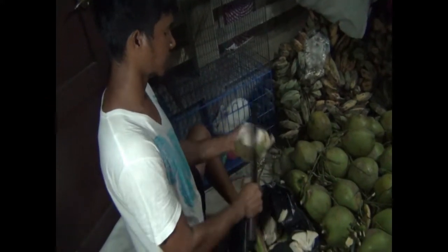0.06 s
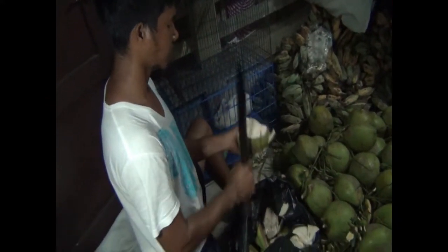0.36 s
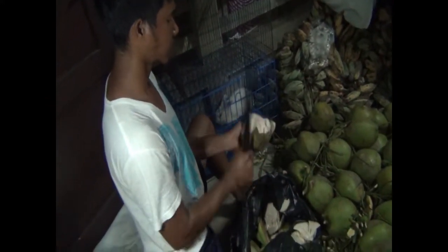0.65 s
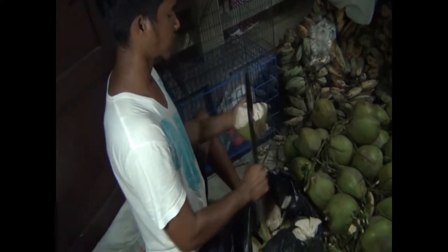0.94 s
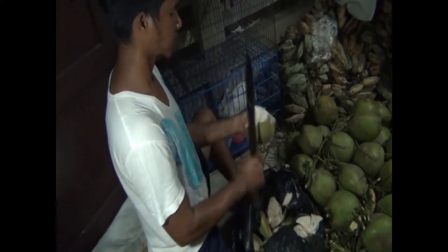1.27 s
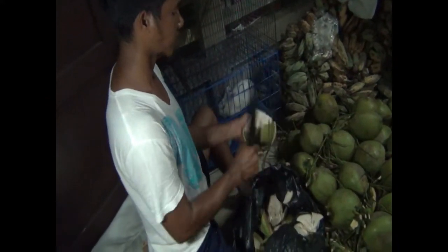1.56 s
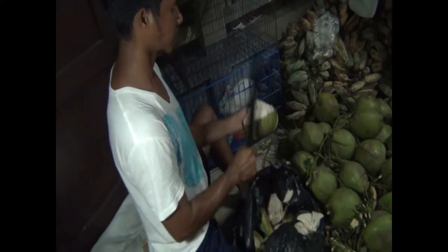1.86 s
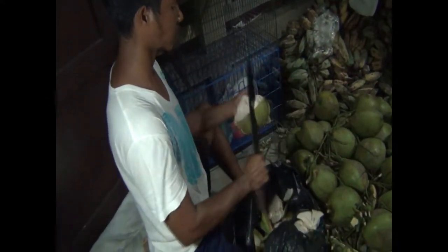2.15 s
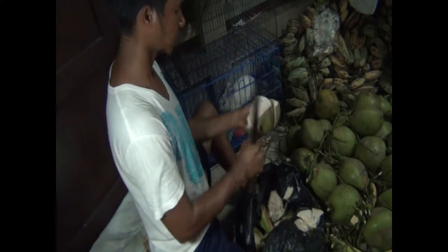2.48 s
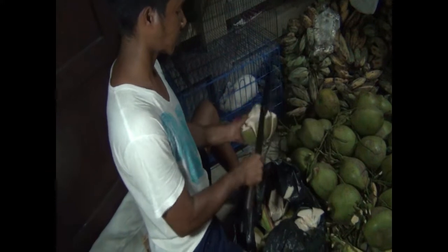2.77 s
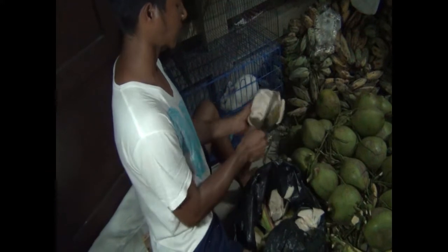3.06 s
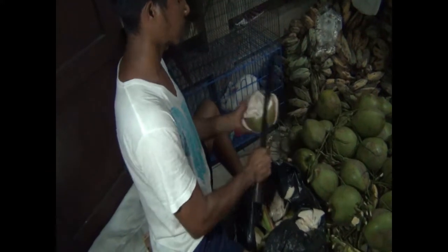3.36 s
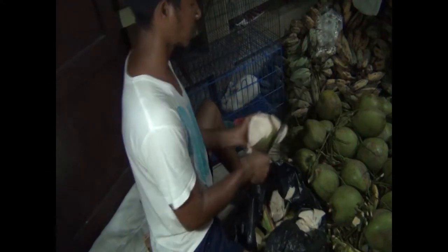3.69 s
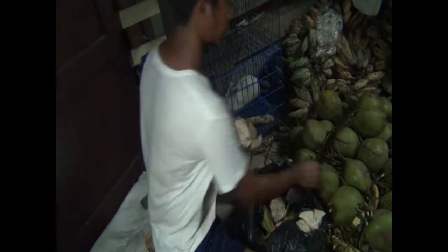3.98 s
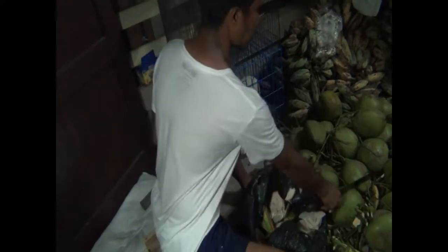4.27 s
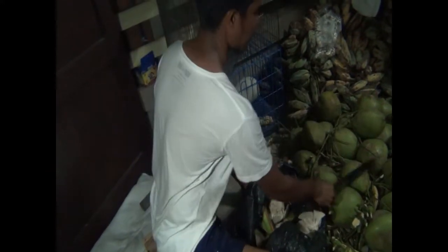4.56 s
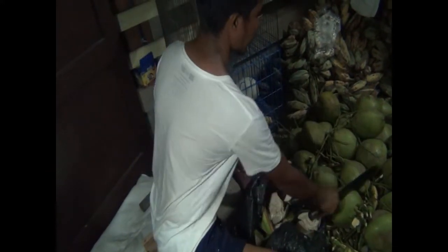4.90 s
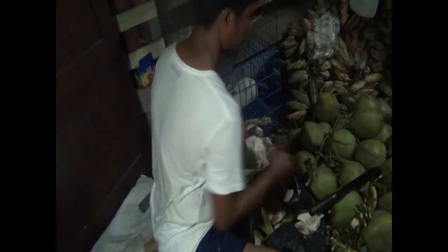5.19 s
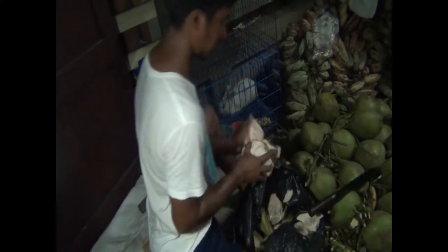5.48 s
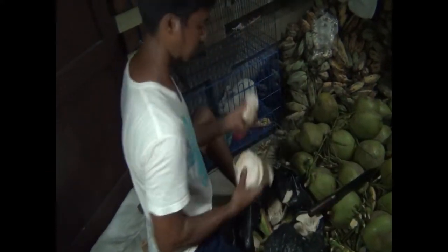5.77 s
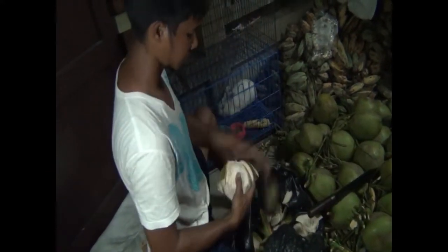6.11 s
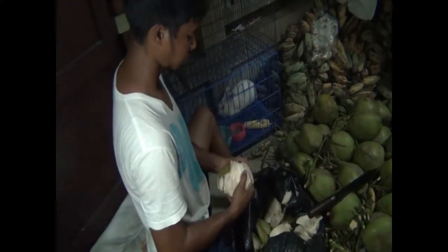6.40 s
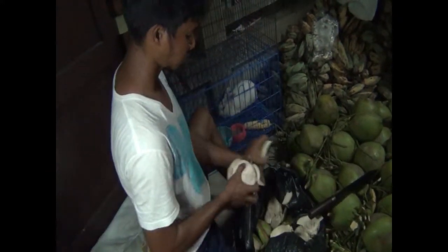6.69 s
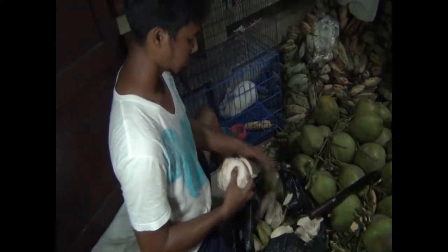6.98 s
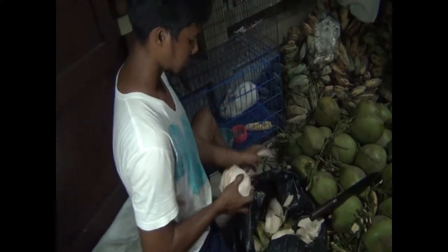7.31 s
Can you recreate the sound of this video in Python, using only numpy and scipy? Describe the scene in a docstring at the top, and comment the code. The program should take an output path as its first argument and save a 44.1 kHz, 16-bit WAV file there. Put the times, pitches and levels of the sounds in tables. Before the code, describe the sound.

A large knife trims a green coconut in quick strokes, each a sharp crunch and hollow knock, then a wet fibrous hiss, often with a faint steel ring. Two woody chops follow as the blade strikes a heap of nuts. Hands then tear off strips that rasp and snap, and scraps drop onto a crinkly plastic bag. It sounds close, in a small room with a faint machine hum.

```python
"""At a coconut stall, a large knife trims a green nut: it bites into the husk, hisses through the
wet fibres and rings as it comes free, while the hollow nut knocks and resounds under it.
The knife is then chopped twice into a heap of nuts. Hands tear off loose strips, which rasp and
snap, and scraps drop on a crinkly plastic bag. A small room answers, over a faint machine hum."""
import sys
import numpy as np
from scipy import signal
from scipy.fft import rfft, irfft, next_fast_len
from scipy.io import wavfile
from scipy.ndimage import map_coordinates

SR = 44100
rng = np.random.default_rng(int(sys.argv[2]) if len(sys.argv) > 2 else 0)


def to_wav(sig):
    """Store sig (one row per channel, or 1-D mono) as 16-bit WAV at the path in sys.argv[1].

    Samples outside -1..1 are clipped; the rate is SR.
    """
    pcm = np.clip(np.atleast_2d(sig), -1, 1) * 32767
    pcm = np.round(pcm).astype(np.int16)
    wavfile.write(sys.argv[1], SR, pcm.T)  # frames by channels


N = 328534

# Levels are set before each function's own gains. A fade time (t60) is the time to fall by 60 dB.
# The blade bites. Each row: start in seconds, level in dB, extra dB for the knock, pitch multiplier.
BITE_HITS = [(0.0953, -12.5, -11.5, .97), (0.4626, -13.5, -17, 1.1), (0.7877, -13.5, -13, 1.03),
             (1.384, -11, -24, 1.04), (1.694, -12, -24, 1.07), (1.9975, -13, -17.5, 1),
             (2.6194, -12, -15.5, 1.07), (3.2803, -13, -22, 1.12)]
# Pushes through the husk. Each row: moment of full force, hold time and ramp time in seconds,
# level in dB, extra dB for the hollow tone, its pitch in Hz.
HUSK_PUSHES = [(0.162, 0.032, 0.03, -22.5, -9, 1750), (0.504, 0.088, 0.014, -25.5, -7.5, 1660),
               (1.092, 0.068, 0.016, -22.5, -7.5, 1700), (1.444, 0.032, 0.023, -22.5, -4.5, 1650),
               (1.735, 0.05, 0.016, -23.5, -11.5, 1880), (2.294, 0.054, .024, -21, -8.5, 1730),
               (2.704, 0.036, 0.035, -36.5, -7.5, 1800), (2.904, 0.016, 0.042, -20.5, -6.5, 1800),
               (3.56, 0.082, 0.01, -22, -7.5, 1850)]
# Flaps break away, longer ones sounding lower. Each row: start in seconds, level in dB, pitch in Hz.
FLAP_BREAKS = [(.505, -25, 2900), (0.581, -30, 1056), (1.137, -25, 1084), (1.445, -22.5, 1510),
               (2.325, -26.5, 1620), (2.909, -24, 1600), (3.563, -24, 1570), (7.164, -26, 1850)]
# The blade slips free. Each row: start in seconds, then dB for the first, second and two high tones.
BLADE_RELEASES = [(0.268, -51.5, -59, -37.5), (.63, -65, -50.5, -42.5), (1.225, -53, -48.5, -44.5),
                  (1.527, -59, -48, -38.5), (1.864, -57, -53, -40), (2.45, -60, -60, -41.5)]
# Light knocks on the nut. Each row: start in seconds, level in dB.
KNIFE_TAPS = [(0.06, -29.5), (0.413, -29.5), (0.7256, -33), (1.034, -27.5), (2.58, -37), (3.2489, -23.5),
              (3.907, -23)]
# Chops into the heap. Each row: start in seconds, level in dB, extra dB for the crack, pitch multiplier.
HEAP_CHOPS = [(4.2434, -8.5, -8, 1.04), (4.944, -7.5, -10, .99)]
# The stuck blade is levered. Each row: start in seconds, level in dB, length in seconds.
LEVER_CREAKS = [(4.527, -38, 0.06), (5.047, -40.5, 0.034)]
# Strips torn by hand. Each row: start and length in seconds, level in dB, extra dB for the crackle.
STRIP_TEARS = [(5.438, 0.28, -32, -4), (6.5, 0.235, -29, -8), (7.2, 0.074, -29, -6)]
# Thick fibres snap. Each row: start in seconds, level in dB, fade time in seconds.
FIBRE_SNAPS = [(3.707, -25, 0.066), (3.7966, -22, 0.071), (3.873, -25, 0.073), (3.9074, -19, 0.045),
               (5.432, -12, 0.011), (5.4448, -13.5, .008), (5.4672, -14, .008), (5.507, -16.5, .012),
               (5.5185, -16, .003), (5.5475, -12, .02), (5.558, -15.5, .04), (5.5697, -10, 0.011),
               (5.6184, -16, .015), (5.667, -12.5, .035), (6.3714, -24.5, 0.033), (6.475, -23, .04),
               (6.497, -21.5, .05), (6.6044, -10.5, 0.042), (6.7359, -17, .055), (7.236, -15, 0.043)]
# A strip slides off. One row: start and length in seconds, level in dB, pitch in Hz, rise in Hz a second.
STRIP_SQUEAK = (7.238, .022, -43, 3200, 2500)
# Scraps land. Each row: start in seconds, level in dB, extra dB for the thud, crinkle fade in seconds.
SCRAP_DROPS = [(4.2954, -22.5, -21, .13), (6.205, -22, -3, .1), (6.2235, -10, -7, 0.12),
               (6.3014, -24.5, -20, 0.18), (7.016, -25.5, -1, 0.32), (7.056, -18, -17, .11),
               (7.103, -23.5, -4.5, 0.13), (7.1645, -18.5, -12, 0.037), (7.301, -18.5, -10.5, 0.099),
               (7.3495, -16, -22, 0.07), (7.399, -20, -20, .09)]

# The steel's own tones. Each row: pitch in Hz, fade time in seconds.
STEEL_TONES = [(4274, .45), (5071, .4), (11472, .15), (12651, .12)]
# Tones of struck things. Each row: pitch in Hz, level in dB, fade time in seconds.
NUT_TONES = [(270, -3, .1), (410, -4, .09), (840, 1, .08)]
CLACK_TONES = [(1238, -4, .05), (3020, -3.5, 0.096), (3140, 0.5, 0.083), (3413, -3, 0.08), (3730, -6, .06)]
HEAP_TONES = [(86.1, -19.5, 0.36), (419, -14.5, 0.15), (970, -11, 0.12), (1047, -11.5, 0.15),
              (1285, -10, 0.1), (1430, -2, 0.11), (1500, 4.5, 0.028), (1800, -1, 0.09)]
# The machine's hum. Each row: pitch in Hz, level in dB.
HUM_TONES = [(88, -65.5), (351, -52.5)]

# A flap's tone colour. Each row: multiple of the flap's pitch, relative level in dB.
FLAP_COLOUR = [(.4, -24.5), (.8, -16), (1, 1.5), (1.25, -11.5), (2.2, -12.5), (5, -38)]
# Tone colours of the other noises. Each row: frequency in Hz, relative level in dB.
CRACK_COLOUR = [(300, -31), (1100, -3), (2000, -1), (2750, -0.5), (4000, -3.5), (7800, -4.5), (9600, -1),
                (10150, 4), (10700, 1), (13000, -3), (15800, -18)]
KNOCK_COLOUR = [(100, -15.5), (200, 2), (330, 6), (425, 8.5), (560, 2.5), (850, 6.5), (1400, 9.5),
                (3500, -8.5)]
FIBRE_COLOUR = [(1100, -12), (2000, 1.5), (3000, 3), (4500, -1), (6500, 2.5), (10000, 5.5), (11800, 7),
                (14000, -2.5), (15800, -10.5)]
HOLLOW_COLOUR = [(150, -27.5), (430, -10.5), (600, -15.5), (1000, -2.5), (1400, -1), (1750, 8), (2150, 0.5),
                 (2900, -10), (5000, -11)]
SNAP_COLOUR = [(900, -18.5), (2200, -6.5), (5000, -5.5), (9000, -0.5), (12000, -2.5), (16000, -14.5)]
BAG_COLOUR = [(300, -13), (800, -2.5), (1700, -1.5), (3000, -3), (5000, -8.5), (9000, -4.5), (13000, -13),
              (16000, -28)]
THUD_COLOUR = [(50, -33), (105, -20), (170, -9), (320, -5), (405, 1), (520, -6), (900, -6.5), (2500, -17)]
AIR_COLOUR = [(15, -74), (25, -25), (50, -6.5), (240, -3), (470, -10.5), (950, -10.5), (1750, -15.5),
              (3100, -25.5), (5500, -28.5), (15800, -31)]
AIR_SIDE_COLOUR = [(30, -28), (300, -8), (1000, -8), (15000, -31)]
TICK_COLOUR = [(400, -23), (1200, 2), (2300, -4), (3400, 0), (4600, -12), (10000, -7.5), (16000, -17)]
WOOD_COLOUR = [(35, -36), (80, 2), (130, -12), (700, -13), (1050, -1.5), (1550, 5), (2200, -1),
               (3000, -7.5), (6000, -27)]
RIND_COLOUR = [(400, -7.5), (1200, -4.5), (4500, -6), (9000, -7), (15000, -22)]
STRAND_COLOUR = [(1000, -17), (2000, -.5), (5000, -4), (10000, 4), (12500, 1), (15800, -10.5)]

# The room's echo. Each row: frequency in Hz, fade time in seconds.
ROOM_FADES = [(150, 0.49), (1500, 0.33), (5000, 0.26), (14000, 0.23)]
# Timing at the two microphone openings. Each row: frequency in Hz, the left one's lead in radians.
LEFT_LEAD = [(100, 0.016), (1100, 0.52)]
# Their balance. Each row: frequency in Hz, left level minus right level in dB.
LEFT_BALANCE = [(200, -0.1), (9000, -2.5)]


def bites(crack_db=-4, knock_db=-3, ring_db=-8, sink_s=.00503):
    """The edge crushes a dense pack of fibres in a moment, sinks in and knocks the hollow nut."""
    edge, nut = np.zeros((2, N))
    for start, db, body_db, pitch in BITE_HITS:
        add(edge, start, amp(db + crack_db) * burst(rise=.0015, hold=.0077, t60=.058))
        blow = burst(rise=.00038, hold=.023, t60=.13) * rng.standard_normal(SR // 2)
        add(nut, start, amp(db + body_db + knock_db) * colour(blow, KNOCK_COLOUR, pitch))
        add(nut, start + sink_s, amp(db + body_db + ring_db) * ringing(NUT_TONES, pitch, spread_db=.5))
    return colour(edge * crush_fibres(), CRACK_COLOUR) + nut


def crush_fibres():
    """Packed fibres give way so fast that they blur into one crunch."""
    return fibres(14000, spread_db=1, clump_db=1.4, clump_rate=540)


def slices(hollow_db=-1.4, judder_db=5, catch_db=1.5, sway_ratio=1.104, growth_db_per_s=55):
    """The blade runs through wet husk: thousands of fine breaks a second hiss and stir the hollow nut."""
    t, edge, body = np.arange(N) / SR, np.zeros(N), np.zeros(N)
    hollow_peak_hz = 1750
    breaks = fibres(7000, spread_db=1.5, clump_db=3, clump_rate=560)
    slip = np.tanh(wobble(140))  # the blade catches and slips
    # The lifting flap changes length, so the hollow tone sways between three pitches.
    sway = np.tanh(wobble(22.02))
    shares = (np.maximum(-sway, 0), 1 - np.abs(sway), np.maximum(sway, 0))
    for start, hold, ramp, db, body_db, hz in HUSK_PUSHES:
        force = amp(db + push_db(start, hold, ramp)) * breaks
        edge += force
        cut = np.flatnonzero(np.abs(t - start) < .4)
        # As the flap grows, the hollow tone gains on the hiss.
        growth_db = growth_db_per_s * np.clip(t[cut] - start - hold / 2, -hold / 2, hold / 2)
        nut = force[cut] * amp(body_db + hollow_db + growth_db + judder_db * slip[cut])
        for share, ratio in zip(shares, (1 / sway_ratio, 1, sway_ratio)):
            add(body, t[cut[0]], colour(nut * share[cut], HOLLOW_COLOUR, ratio * hz / hollow_peak_hz))
    return colour(edge * amp(catch_db * slip), FIBRE_COLOUR) + body


def push_db(start, hold, ramp, db_per_ramp=12, sag_db_per_s=80, release_ratio=1.14):
    """Level of one push: the knife bears down, slows in the cut and lets go a little more gently."""
    t = np.arange(N) / SR - start
    ramps_away = (np.maximum(-t, 0) + np.maximum(t - hold, 0) / release_ratio) / ramp
    return -db_per_ramp * np.minimum(ramps_away, 20) - sag_db_per_s * np.clip(t, 0, hold)


def flaps(flap_db=-1):
    """The last fibres of a flap of husk give way together and ring it with a woody crunch."""
    out = np.zeros(N)
    breaks = fibres(9000, spread_db=2.5, clump_db=0, clump_rate=300)
    for start, db, hz in FLAP_BREAKS:
        force = np.zeros(N)
        add(force, start, amp(db + flap_db) * burst(rise=.0012, hold=.0073, t60=.088))
        out += colour(force * breaks, FLAP_COLOUR, hz)
    return out


def blade_ring(ring_db=3, waver_db=5):
    """The edge scrapes off the nut and leaves the steel ringing, wavering as the knife swings back."""
    ring, scrape, t = np.zeros(N), np.zeros(N), np.arange(SR // 2) / SR
    for k, (hz, t60) in enumerate(STEEL_TONES):
        tone = np.zeros(N)
        ping = burst(rise=.0032, hold=.019, t60=t60) * np.sin(2 * np.pi * hz * t)
        for start, first_db, second_db, high_db in BLADE_RELEASES:
            add(tone, start, amp((first_db, second_db, high_db, high_db)[k]) * ping)
        ring += tone * amp(ring_db + waver_db * np.tanh(wobble(29.86)))
    for start, _, _, high_db in BLADE_RELEASES:
        add(scrape, start - .008, amp(high_db + 5) * burst(rise=.0051, hold=.01, t60=.15))
    return ring + colour(scrape * rng.standard_normal(N), FIBRE_COLOUR)


def taps(tick_db=-9, clack_db=-13):
    """The knife knocks lightly on the nut: a dry tick and a small pitched clack."""
    force, clacks = np.zeros((2, N))
    for start, db in KNIFE_TAPS:
        add(force, start, amp(db + tick_db) * burst(rise=.00036, hold=.0012, t60=.09))
        add(clacks, start, amp(db + clack_db) * ringing(CLACK_TONES, pitch=.99, spread_db=1.5))
    return colour(force * rng.standard_normal(N), TICK_COLOUR) + clacks


def chops(ring_db=-11, knock_db=-9, crack_db=-8):
    """The knife cracks into a nut with a woody knock; the heap rings and the husk creaks on the blade."""
    ring, knock, crack, creak = np.zeros((4, N))
    for start, db, edge_db, pitch in HEAP_CHOPS:
        add(ring, start, amp(db + ring_db) * ringing(HEAP_TONES, pitch, spread_db=1))
        add(knock, start, amp(db + knock_db) * burst(rise=.0015, hold=.0016, t60=.096))
        add(crack, start, amp(db + edge_db + crack_db) * burst(rise=.00026, hold=.0018, t60=.14))
    for start, db, length in LEVER_CREAKS:
        add(creak, start, amp(db) * burst(rise=.0064, hold=length, t60=.067))
    noise = rng.standard_normal(N)
    rind = crack * noise + creak * fibres(3000, spread_db=2, clump_db=2, clump_rate=270)
    return ring + colour(knock * noise, WOOD_COLOUR) + colour(rind, RIND_COLOUR)


def tears(rasp_db=-2.5, crackle_db=-3, crackles_per_s=170, hollow_db=-12):
    """Pulled by hand, fibres part in a fine rasp and small bundles crackle at random."""
    tension = sum(amp(db) * pull(start, length) for start, length, db, _ in STRIP_TEARS)
    brittle = sum(amp(db + extra) * pull(start, length) for start, length, db, extra in STRIP_TEARS)
    bundles = np.abs(fibres(crackles_per_s, spread_db=5, clump_db=3, clump_rate=40))
    pops = signal.oaconvolve(bundles, burst(rise=.0001, hold=.0003, t60=.004))[:N]
    crackle = unit(pops * rng.standard_normal(N))
    rasp = fibres(4000, spread_db=2, clump_db=2.5, clump_rate=220)
    force = amp(crackle_db) * brittle * crackle + amp(rasp_db) * tension * rasp
    return colour(force, STRAND_COLOUR) + amp(hollow_db) * colour(force, HOLLOW_COLOUR)


def pull(start, length, swell_db=8.5, grip_s=.032):
    """Force on one strip: the fingers take hold, pull hardest in the middle and let go."""
    from_middle = np.abs(np.arange(N) / SR - start - length / 2)
    swell = amp(-swell_db * np.minimum(2 * from_middle / length, 1))
    return swell * np.exp(-np.maximum(from_middle - length / 2, 0) / grip_s)


def snaps(snap_db=.5, pitch_spread=.14):
    """A thick fibre parts with a sharp tick, a bundle with a longer crack; each has its own pitch."""
    out = np.zeros(N)
    for start, db, t60 in FIBRE_SNAPS:
        force = burst(rise=.00023, hold=.0005, t60=t60) * rng.standard_normal(SR // 2)
        pitch = np.exp(pitch_spread * rng.uniform(-.96, 1))
        snap = colour(force, SNAP_COLOUR, pitch)
        add(out, start, amp(db + snap_db) * snap / np.abs(snap).max())
    return out


def squeak(jitter_hz=170):
    """Wet husk sticks and slips fast enough to give a short rising note."""
    start, length, db, base_hz, hz_per_s = STRIP_SQUEAK
    out, t = np.zeros(N), np.arange(SR // 2) / SR
    hz = base_hz + hz_per_s * t + jitter_hz * wobble(500)[:len(t)]
    note = np.sin(2 * np.pi * np.cumsum(hz) / SR)
    add(out, start, amp(db) * burst(rise=.004, hold=length, t60=.03) * note)
    return out


def drops(crinkle_db=-7.5, thud_db=-9):
    """Each scrap of husk thuds softly and crinkles the plastic bag."""
    plastic, weight = np.zeros((2, N))
    for start, db, extra_db, t60 in SCRAP_DROPS:
        add(plastic, start, amp(db + crinkle_db) * burst(rise=.0019, hold=.0015, t60=t60))
        add(weight, start, amp(db + extra_db + thud_db) * burst(rise=.01, hold=.033, t60=.096))
    crinkle = fibres(5000, spread_db=.5, clump_db=2, clump_rate=400)
    return colour(plastic * crinkle, BAG_COLOUR) + colour(weight * rng.standard_normal(N), THUD_COLOUR)


def room(sound, tail_db, near_db, near_t60=.031, width=.47, size=13000):
    """The direct sound, quick echoes off nearby crates and nuts, and the room's fading tail."""
    t, out = np.arange(size) / SR, np.zeros((2, N))
    hz, age, _ = signal.stft(t, SR, nperseg=256)
    fade = amp(-60 * age / along(ROOM_FADES, hz)[:, None])
    scatter = amp(-60 * t / near_t60) * (t > .001)
    for first in range(0, N, size):  # fresh echoes for each block, as the hands move
        noise = signal.stft(rng.standard_normal((2, size)), nperseg=256)[2]
        tail = signal.istft(noise * fade, nperseg=256)[1][:, :size] * (1 - np.exp(-t / .0038))
        near = rng.standard_normal((2, size)) * scatter
        echoes = (amp(tail_db) * unit(tail) + amp(near_db) * unit(near)) / np.sqrt(size)
        echoes[0, 0] += 1  # the direct sound
        echoes /= np.linalg.norm(echoes[0])
        mid, side = signal.fftconvolve(sound[None, first:first + size], echoes, axes=1)
        add(out[0], first / SR, mid + width * side)
        add(out[1], first / SR, mid - width * side)
    return out


def background(air_db=-47.5, side_db=-15):
    """Distant rumble, faint hiss and a slightly unsteady machine hum."""
    t = np.arange(N) / SR
    mid = amp(air_db + .16 * wobble(10)) * colour(rng.standard_normal(N), AIR_COLOUR)
    side = amp(air_db + side_db) * colour(rng.standard_normal(N), AIR_SIDE_COLOUR)
    hum = sum(amp(db + .19 * wobble(5.2)) * np.sin(2 * np.pi * hz * t + .5 * wobble(5.7))
              for hz, db in HUM_TONES)
    return np.array([mid + side, mid - side]) + hum


def fibres(rate, spread_db, clump_db, clump_rate):
    """Tiny breaks of uneven size that come in bundles, about `rate` breaks a second."""
    breaks = (rng.random(N) < rate / SR) * np.sign(rng.standard_normal(N))
    size_db = spread_db * np.clip(rng.standard_normal(N), -2, 2)
    bundle_db = clump_db * np.clip(wobble(clump_rate), -2, 2)
    return unit(breaks * amp(size_db + bundle_db))


def burst(rise, hold, t60):
    """Force of one contact: it builds, holds and dies away (times in seconds)."""
    t = np.arange(SR // 2) / SR
    return (1 - np.exp(-t / rise)) * amp(-60 * np.maximum(t - hold, 0) / t60)


def ringing(tones, pitch, spread_db):
    """A struck thing rings at its own tones, a little differently each time."""
    t, out = np.arange(SR // 2) / SR, np.zeros(SR // 2)
    for hz, db, t60 in tones:
        level = amp(db + rng.normal(0, spread_db)) * burst(rise=1.1 / hz, hold=0, t60=t60)
        tuned_hz = hz * pitch * (1 + rng.normal(0, .005))
        out += level * np.sin(2 * np.pi * (tuned_hz * t + rng.random()))
    return out


def colour(sound, spectrum, pitch=1, size=4096):
    """Filter a sound to a tone colour whose frequencies are multiplied by `pitch`."""
    shifted = [(hz * pitch, db) for hz, db in spectrum]
    gain = amp(along(shifted, np.fft.rfftfreq(size, 1 / SR)))
    # Folding the cepstrum makes the filter ring only after a hit, never before it.
    cepstrum = irfft(np.log(np.maximum(gain, 1e-6)))
    cepstrum[1:size // 2] *= 2
    cepstrum[size // 2 + 1:] = 0
    pulse = irfft(np.exp(rfft(cepstrum)))
    return signal.oaconvolve(sound, pulse / np.linalg.norm(pulse))[:N]


def wobble(rate):
    """A smooth curve through `rate` random points a second."""
    points = rng.standard_normal(int(N * rate / SR) + 4)
    fine = map_coordinates(points, [np.arange(8 * len(points) - 8) / 8])
    return np.interp(np.arange(N) * (8 * rate / SR), np.arange(len(fine)), fine)


def amp(db):
    """Turn decibels into a multiplier."""
    return 10 ** (np.asarray(db) / 20)


def unit(sound):
    """Scale a sound to an average power of 1."""
    return sound / np.sqrt(np.mean(sound ** 2) + 1e-20)


def along(table, hz):
    """Read between a table's rows on a log frequency scale."""
    row_hz, values = np.transpose(table)
    return np.interp(np.log(hz + 1), np.log(row_hz + 1), values)


def add(track, start, sound):
    """Mix a sound into a track at `start` seconds."""
    part = track[max(round(start * SR), 0):][:len(sound)]
    part += sound[:len(part)]


def scene():
    """Handwork and sounds on the ground echo in one small room; ringing steel and background join them."""
    handwork = bites() + slices() + flaps() + tears() + snaps() + squeak() + taps()
    in_hand = room(handwork, tail_db=-8, near_db=-8)
    on_ground = room(chops() + drops(), tail_db=-7.5, near_db=-10)
    return in_hand + on_ground + blade_ring() + background()


def record(dry, ceiling=.55, top_hz=16000):
    """Loud peaks are rounded, left and right differ in timing and level, and the top treble is cut."""
    rounded = dry / (1 + (dry / ceiling) ** 4) ** (1 / 4)
    size = next_fast_len(N + SR // 4)
    hz = np.fft.rfftfreq(size, 1 / SR)
    half = np.array([[.5], [-.5]])
    openings = amp(half * along(LEFT_BALANCE, hz)) * np.exp(1j * half * along(LEFT_LEAD, hz))
    return irfft(rfft(rounded, size) * openings * (hz < top_hz), size)[:, :N]


dry = scene()
out = record(dry)
to_wav(out)
```